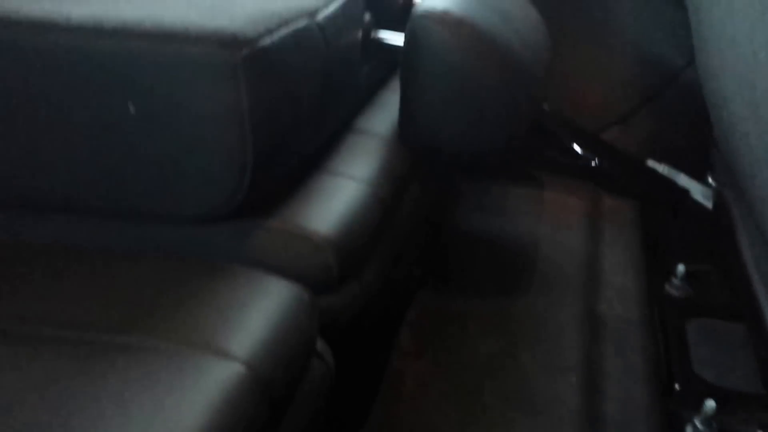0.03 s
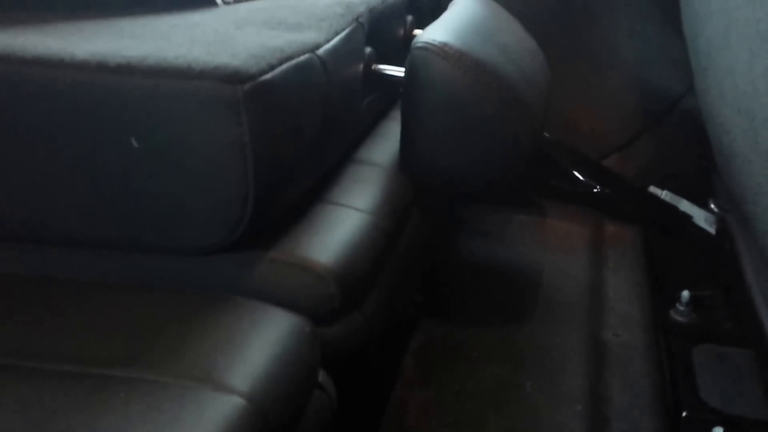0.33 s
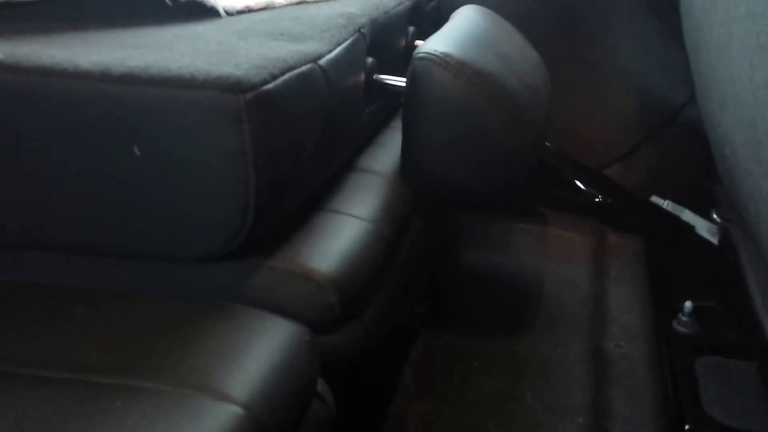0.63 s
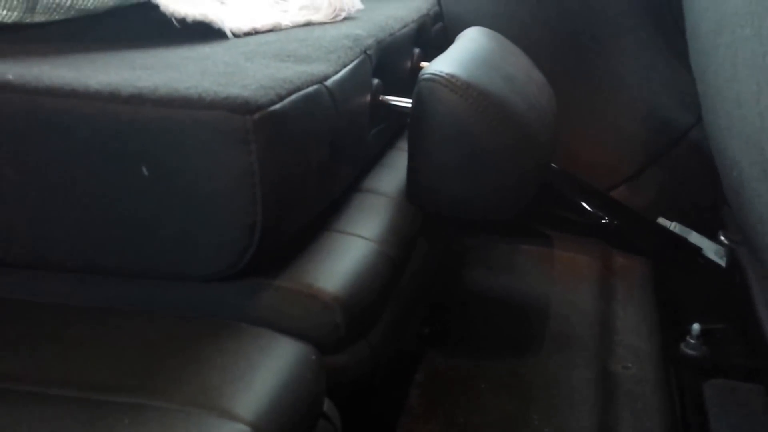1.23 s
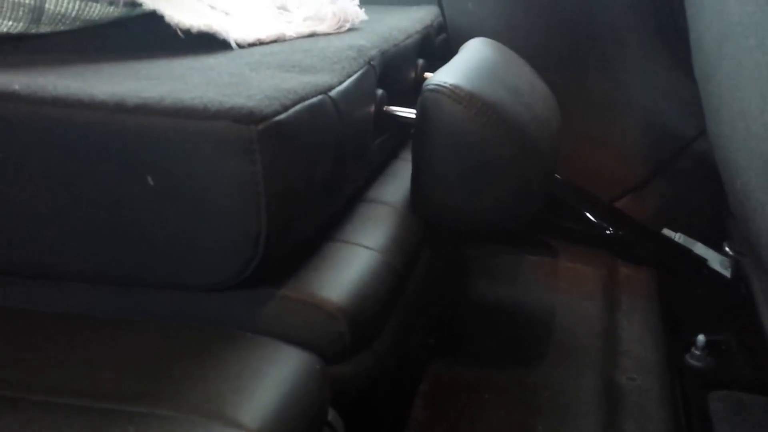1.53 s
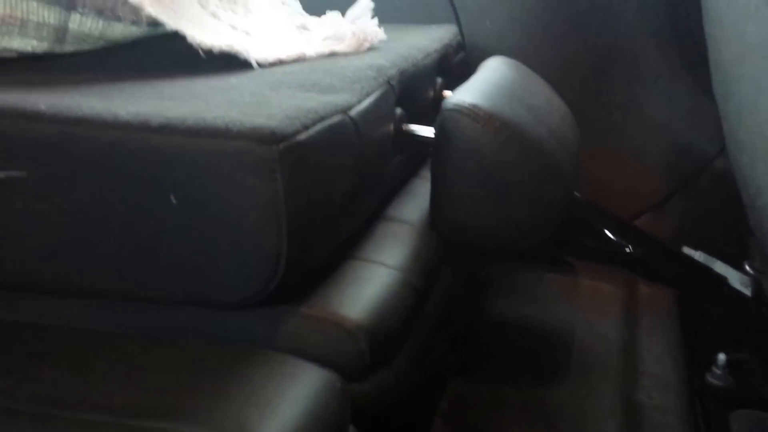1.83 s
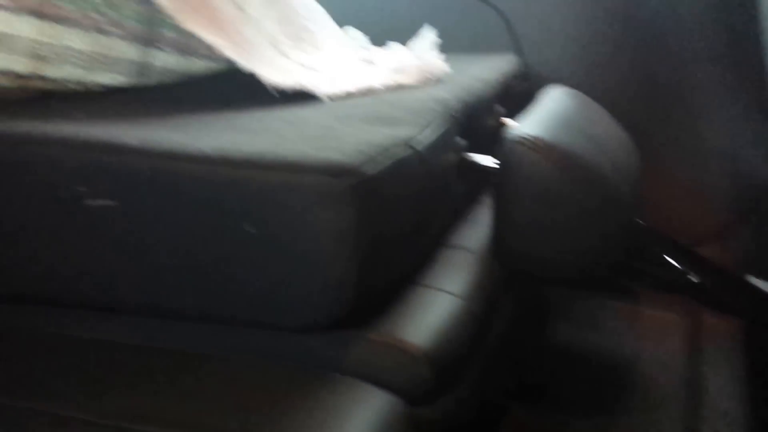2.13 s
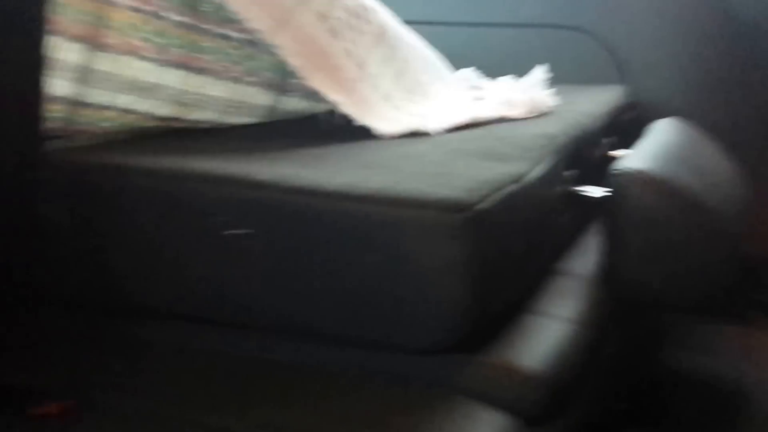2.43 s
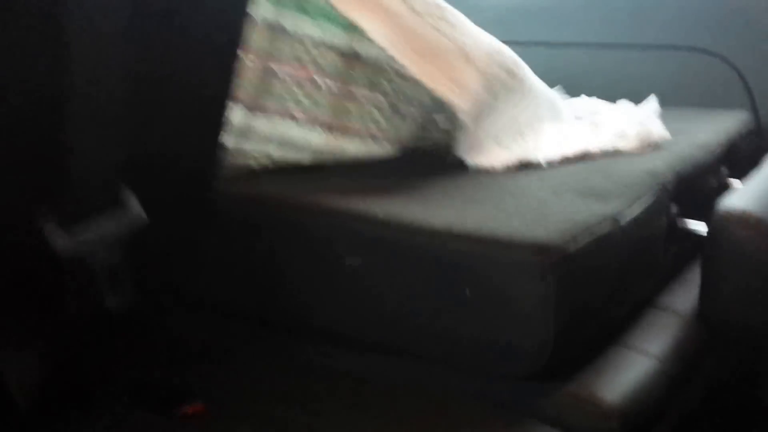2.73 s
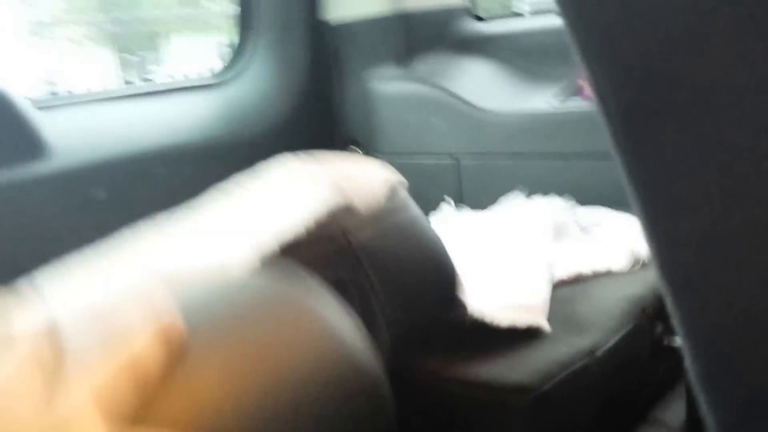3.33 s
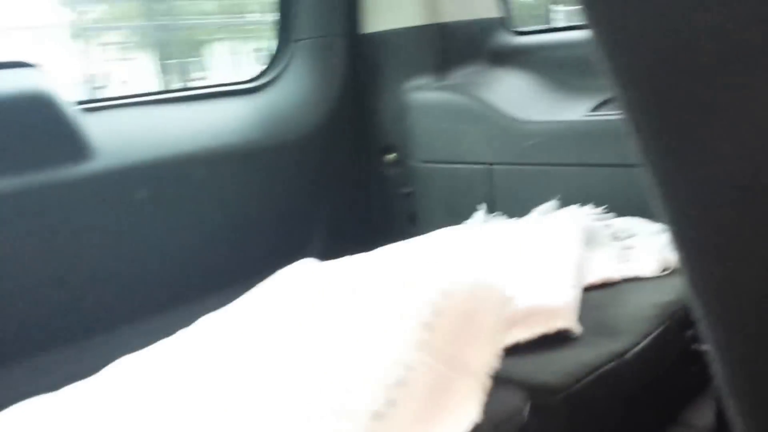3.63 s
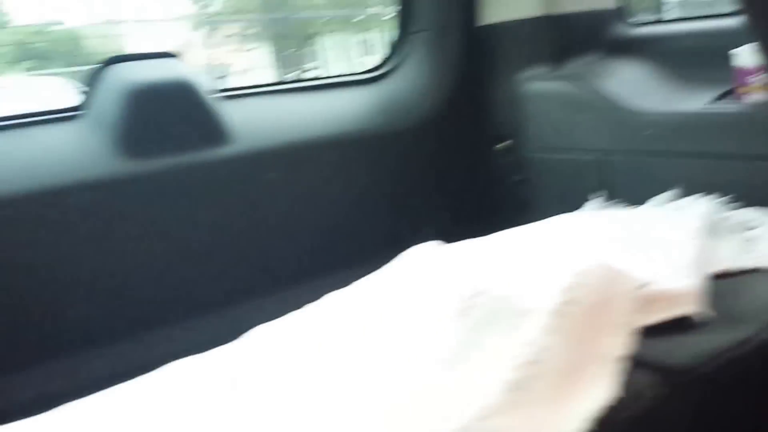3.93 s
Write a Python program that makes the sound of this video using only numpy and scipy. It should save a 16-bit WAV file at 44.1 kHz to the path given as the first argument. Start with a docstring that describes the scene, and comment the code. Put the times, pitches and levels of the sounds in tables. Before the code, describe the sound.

A car seat swings over with a cloth whoosh and latches with a loud clunk.

```python
"""Inside a parked car, a hand-held stereo microphone close to a folded seat back. A low cabin rumble
comes first. From 1.6 s plastic fittings click; the seat is swung over and its upholstery slides with
a swelling whoosh, among soft bumps of the padding and brief hinge squeaks. At 3.6 s the steel latch
snaps home, the seat thumps against its stop and the car body booms briefly. Last comes a thin squeal
as the seat settles."""
import sys
import numpy as np
from scipy import signal
from scipy.fft import rfft, irfft
from scipy.io import wavfile

SR = 44100
rng = np.random.default_rng(int(sys.argv[2]) if len(sys.argv) > 2 else 0)


def output_pcm(signal):
    """Save a mono or channel-first signal as 16-bit PCM at the path in sys.argv[1].

    Samples are clipped to [-1, 1] before scaling.
    """
    pcm = np.clip(np.atleast_2d(signal).T, -1, 1) * 32767
    wavfile.write(sys.argv[1], SR, np.round(pcm).astype(np.int16))


N = 176400


def undb(db):
    """Decibels to gain."""
    return 10 ** (np.asarray(db) / 20)


def unit(x):
    """Scale to rms 1."""
    return x / np.sqrt(np.mean(x ** 2))


def curve(table, column=1):
    """A column of a time table at every sample."""
    rows = np.array(table)
    return np.interp(np.arange(N) / SR, rows[:, 0], rows[:, column])


def freqs():
    """Frequency of each spectral bin."""
    return np.maximum(np.arange(N // 2 + 1) * SR / N, 1)


def across(table):
    """A (Hz, value) table at every bin."""
    rows = np.array(table)
    return np.interp(np.log(freqs()), np.log(rows[:, 0]), rows[:, 1])


def band(hz, width):
    """Gain of a steep resonance, its width in Hz."""
    f = freqs()
    return 1 / (1 + ((f * f - hz * hz) / (f * width)) ** 2)


def shape(x, gain):
    """Filter by a gain for each bin."""
    return irfft(rfft(x) * gain, N)


def flutter(hz, width):
    """A random waver of rms 1 around a given rate."""
    return unit(shape(rng.standard_normal(N), band(hz, width)))


# How alike the microphone's two sides are. Each row: frequency in Hz, correlation before clipping.
STEREO_LIKENESS = [(60, 3), (125, 2), (250, 1), (500, 0.85), (1000, 0.46), (2200, -0.11), (6000, 0),
                   (14000, 0)]
def noise(gain):
    """Coloured stereo noise of rms 1, alike on both sides in the bass."""
    like = np.clip(across(STEREO_LIKENESS), -.99, .99)
    mid, side = rfft(rng.standard_normal((2, N))) * gain * np.sqrt([1 + like, 1 - like])
    return unit(irfft(np.array([mid + side, mid - side]), N))


def fade(t60):
    """One second of decay after a very quick rise, falling 60 dB in t60 seconds."""
    t = np.arange(SR) / SR
    return undb(-60 * t / t60) * (1 - np.exp(-t / .0002))


def ring(modes):
    """One second of decaying modes."""
    t = np.arange(SR) / SR
    return sum(undb(db) * fade(t60) * np.sin(2 * np.pi * hz * t) for hz, db, t60 in modes)


def piece(x):
    """A random second of a long noise."""
    i = rng.integers(N - SR)
    return x[:, i:i + SR]


def add(out, start, x):
    """Mix a sound in at a time in seconds."""
    i = int(start * SR)
    out[:, i:i + x.shape[-1]] += x[..., :N - i]


def lean(x, balance_db):
    """Tip the sound between left and right, band by band."""
    gains = undb(across(balance_db) * np.array([[.5], [-.5]]))
    return shape(x, gains / np.sqrt(np.mean(gains ** 2, axis=0)))


# Room tone of the parked car. Each row: frequency in Hz, relative density in dB.
CABIN_SPECTRUM = [(20, -7), (40, -16), (60, -7.5), (90, -6), (128, 0), (175, -12.5), (290, -11),
                  (400, -18.5), (500, -21), (660, -19), (900, -23), (1500, -31), (2100, -36.5), (3000, -39),
                  (4300, -36.5), (7000, -38.5), (12000, -39), (14500, -42.5)]
# The rumble drifts a little. Each row: time in seconds, level in dB.
RUMBLE_DRIFT = [(0, -47), (1.2, -46), (1.5, -43), (1.85, -47), (2.2, -45), (2.6, -46.5), (3.3, -44),
                (4, -45)]
# Narrow resonances in the room tone. Each row: centre in Hz, width in Hz, level in dB.
CABIN_HUMS = [(136, 28, -58), (188.4, 9.6, -59.5), (632, 17, -64), (5200, 220, -73.5), (5800, 260, -70)]
def cabin():
    """All around the microphone: low rumble, a few narrow resonances and a faint steady hiss."""
    crossover_hz, hiss_db = 1900, -45
    air = noise(undb(across(CABIN_SPECTRUM)))
    rumble = shape(air, 1 / (1 + (freqs() / crossover_hz) ** 2))
    hum = sum(undb(db) * noise(band(hz, width)) for hz, width, db in CABIN_HUMS)
    return rumble * undb(curve(RUMBLE_DRIFT)) + (air - rumble) * undb(hiss_db) + hum


# Sliding cloth from close by. Each row: frequency in Hz, relative density in dB.
CLOTH_SPECTRUM = [(400, -22), (750, -4.5), (1000, -4.5), (1500, -4.5), (2150, -2.5), (2550, -4), (3200, -8),
                  (3900, -8.5), (4800, -5.5), (6200, -5), (7000, -8.5), (8000, -13), (10000, -17),
                  (12400, -18.5), (14500, -27.5)]
# The swing of the seat. Each row: time in seconds, friction level in dB, treble relative to it in dB.
FRICTION = [(1.4, -65, -7), (1.68, -65, 12.5), (1.85, -67, -6), (2.15, -55.5, -0.5), (2.3, -50, -0.5),
            (2.53, -41, -2.5), (2.8, -41.5, 0.5), (2.97, -39, 3.5), (3.13, -39, -2), (3.35, -41.5, -0.5),
            (3.5, -44.5, -1), (3.57, -40.5, -2), (3.75, -54.5, 13), (3.85, -49.5, 7), (3.89, -60, 4),
            (3.94, -58, 4), (3.99, -43, 4.5)]
# A narrow swish in the treble. Each row: time in seconds, level relative to the friction in dB.
SWISH_LEVEL = [(2.3, -16), (3.2, -18), (3.5, -6), (3.85, -12), (4, 5.5)]
def upholstery():
    """Cloth slides with a hiss and tiny snags of the weave; the padding rubs and the frame shudders."""
    snags_per_s, low_cut_hz, treble_hz, flutter_db = 900, 400, 3940, 0.65
    colour = undb(across(CLOTH_SPECTRUM)) / (1 + (low_cut_hz / freqs()) ** 4)
    snags = (rng.random(N) < snags_per_s / SR) * rng.standard_normal((2, N))
    snags *= undb(-0.5 * np.minimum(rng.exponential(size=N), 4))
    hiss = noise(colour) + undb(-8) * unit(shape(snags, colour))
    dull = shape(hiss, 1 / (1 + (freqs() / treble_hz) ** 4))
    treble = (hiss - dull) * undb(curve(FRICTION, column=2))
    level = undb(curve(FRICTION) + flutter_db * flutter(hz=10, width=26))
    swish = undb(curve(SWISH_LEVEL)) * noise(band(hz=5660, width=1800))
    rub = undb(-6.5) * noise(band(hz=227, width=560))
    shudder = undb(-7) * noise(band(hz=91, width=42))
    return (dull + treble + swish + rub + shudder) * level


# Rasp of the weave. Each row: centre in Hz, width in Hz, level relative to the friction in dB.
RASP_BANDS = [(2065, 280, -11.5), (2380, 470, -16)]
def rasp():
    """The weave catches and lets go, sounding two midrange resonances unevenly."""
    out = 0
    for hz, width, db in RASP_BANDS:
        catches_db = 3 * flutter(hz=13, width=26)
        out = out + undb(db + catches_db) * noise(band(hz, width))
    return out * undb(curve(FRICTION))


# Plastic clicks near the microphone. Each row: start in seconds, levels in dB of the body, knock,
# snap and tick bands, base t60 of the tail in seconds.
PLASTIC_KNOCKS = [(1.6331, -32, -29, -41.5, -38.5, 0.052), (1.9074, -52, -47, -39.5, -36.5, 0.043),
                  (1.9141, -35.5, -47, -42, -44.5, 0.047), (1.927, -46, -53, -48, -56, 0.023),
                  (2.171, -49, -62, -40, -56, 0.026), (2.174, -48, -60, -41, -40.5, 0.037),
                  (2.594, -40, -42, -50, -58, 0.036), (3.130, -31.5, -38, -35, -37, 0.047),
                  (3.2061, -42, -31.5, -36, -34.5, 0.056), (3.342, -48, -42, -38, -41, 0.029),
                  (3.379, -35.5, -38.5, -41, -48, 0.086), (3.535, -37, -36.5, -39, -42, 0.14),
                  (3.548, -40, -39, -33, -44, 0.084), (3.5665, -37, -35, -37, -48, 0.19),
                  (3.683, -51, -31.5, -31.5, -54, 0.14), (3.718, -42, -37, -32, -53, 0.1),
                  (3.753, -46, -50, -55, -58, 0.053)]
# Those four bands, low to high. Each row: centre in Hz, width in Hz, factor on the decay times.
PLASTIC_BANDS = [(264, 420, 1.74), (830, 2160, 1.8), (2400, 3500, 1.65), (5250, 3000, 1.5)]
# Ring of the trim. Each row: pitch in Hz, level relative to the knock band in dB, t60 in seconds.
TRIM_RING = [(255, -3.5, 0.056), (593, -2, .06), (1340, -19, .06), (1790, -11, 0.051), (2440, -15, 0.045)]
def fittings():
    """Plastic parts knock with a crack, a noisy tail and a short ring of the trim."""
    crack_t60_s, tail_db = 0.0056, -5.5
    out = np.zeros((2, N))
    bands = [(noise(band(hz, width)), stretch) for hz, width, stretch in PLASTIC_BANDS]
    trim = ring(TRIM_RING)
    for start, *levels, t60 in PLASTIC_KNOCKS:
        add(out, start, undb(levels[1]) * trim)
        for db, (grain, stretch) in zip(levels, bands):
            envelope = fade(crack_t60_s * stretch) + undb(tail_db) * fade(t60 * stretch)
            add(out, start, undb(db) * piece(grain) * envelope)
    return out


# Soft bumps of the cushion. Each row: start in seconds, level in dB, centre in Hz.
CUSHION_BUMPS = [(2.062, -44, 430), (2.115, -37.5, 166), (2.204, -42.5, 150), (2.325, -42.5, 553),
                 (2.468, -37, 265), (2.489, -38, 169), (2.614, -43, 237), (2.648, -41, 250),
                 (2.73, -39, 203), (3.17, -44, 150), (3.269, -39.5, 313)]
# A dull knock of the padded frame. Each row: pitch in Hz, level in dB, t60 in seconds.
FRAME_RING = [(320, -24.5, 0.027), (585, -27, 0.0096), (855, -17.5, 0.012)]
def padding():
    """Soft bumps swell and die as the cushion shifts; the padded frame knocks once."""
    rise_s, frame_knock_s = 0.0058, 3.1629
    out = np.zeros((2, N))
    t = np.arange(SR) / SR
    swell = fade(t60=0.055) * (1 - np.exp(-(t / rise_s) ** 2))
    for start, db, hz in CUSHION_BUMPS:
        add(out, start, undb(db) * swell / swell.max() * piece(noise(band(hz, width=hz * 0.45))))
    add(out, frame_knock_s, -ring(FRAME_RING))
    return out


# Squeaks of the hinge. Each row: start in seconds, pitch in Hz, level in dB, t60 in seconds.
HINGE_SQUEAKS = [(2.175, 4960, -39, 0.052), (3.535, 2350, -20, 0.03), (3.55, 2070, -35, 0.026),
                 (3.716, 3340, -39, 0.081)]
def hinge():
    """The turning hinge gives brief squeaks, each a tone roughened by noise around its pitch."""
    out = np.zeros((2, N))
    for start, hz, db, t60 in HINGE_SQUEAKS:
        roughness = undb(db - 0.5) * fade(t60) * piece(noise(band(hz, width=hz * .12)))
        add(out, start, ring([(hz, db, t60)]) + roughness)
    return out


# The steel latch at close range. Each row: start in seconds, level in dB, ring relative to it in dB,
# brightness in dB per octave.
LATCH_STRIKES = [(3.6264, -16.5, -20, -2), (3.6286, -3, -21, 4.5), (3.6313, -11, -8.5, -4.5),
                 (3.693, -24, -12, 7)]
# Colour of a strike. Each row: frequency in Hz, relative density in dB.
LATCH_SPECTRUM = [(700, -8.5), (1500, -19), (2100, -1.5), (2750, -1.5), (3400, -3), (4500, -0.5),
                  (6000, 4.5), (6900, 2.5), (8200, -6.5), (9500, -9), (10900, -17), (12200, -15),
                  (13400, -19), (14500, -34)]
# Ring of the steel. Each row: pitch in Hz, relative level in dB, t60 in seconds.
STEEL_RING = [(2760, 0, 0.066), (3200, -22, .12), (4700, -20, 0.087), (5100, -18, 0.066),
              (5679, -13, 0.062), (5750, -6, 0.074), (6100, 3, .08), (6400, -12, .085), (6740, -10, .1)]
# Catch and spring zing. Each row: start in seconds, centre and width in Hz, level in dB, t60 in seconds.
SPRING_ZINGS = [(3.693, 5230, 1700, -23, 0.055), (3.629, 11500, 3700, -37.5, 0.17),
                (3.6286, 2530, 360, -17.5, .014), (3.6288, 12300, 4800, -15, 0.0038),
                (3.631, 6230, 1100, -15, 0.026)]
def latch():
    """The steel catch snaps over its striker and rebounds once, shaking its spring."""
    low_cut_hz = 700
    out = np.zeros((2, N))
    steel = undb(-11) * ring(STEEL_RING)
    for start, db, ring_db, tilt_db in LATCH_STRIKES:
        colour = undb(across(LATCH_SPECTRUM) + tilt_db * np.log2(freqs()))
        grain = piece(noise(colour / (1 + (low_cut_hz / freqs()) ** 2)))
        crack = grain * fade(t60=0.0057)
        tail = grain * fade(t60=0.11) + steel
        add(out, start, undb(db) * (crack + undb(ring_db) * tail))
    for start, hz, width, db, t60 in SPRING_ZINGS:
        add(out, start, undb(db) * fade(t60) * piece(noise(band(hz, width))))
    return out


# The seat meets its stop. Each row: start in seconds, level in dB, contact in seconds, rattle in dB.
STOP_THUMPS = [(3.6288, -19.5, 0.0018, -28.5), (3.645, -17, 0.0058, -26), (3.6603, -17, 0.00051, -24.5),
               (3.675, -30, 0.003, -46), (3.701, -25, 0.004, -31.5)]
# Seat frame and car body from inside. Each row: pitch in Hz, relative level in dB, t60 in seconds.
BODY_RING = [(28.2, -12, 1), (40.4, -18, 1), (57, -18, 0.36), (87.6, -10, 0.29), (132.6, -10.5, 0.31),
             (164, -10.5, 0.14), (191, -0.5, 0.058), (270.3, -10, 0.09), (329, 3.5, 0.035), (447, 5, 0.024),
             (493, -0.5, 0.041), (657, -22, 0.078), (807, -4, 0.041), (1100, -22, .03)]
def seat_stop():
    """Padded blows ring the frame and body, shake loose parts and leave a boom in the cabin."""
    out = np.zeros((2, N))
    body = ring(BODY_RING)
    loose_parts = noise(band(hz=533, width=1700))
    cabin_air = noise(band(hz=119, width=130))
    t = np.arange(SR // 10) / SR
    for start, db, contact_s, rattle_db in STOP_THUMPS:
        push = t * np.exp(-4 * t / contact_s)  # longer contact, duller blow
        blow = signal.fftconvolve(body, push / push.sum())[:SR]
        boom = undb(-9) * piece(cabin_air) * fade(t60=0.36)
        rattle = undb(rattle_db) * piece(loose_parts) * fade(t60=0.12)
        add(out, start, undb(db) * (boom - blow) + rattle)
    return out


def squeal():
    """As the seat settles, a faint rubbing tone swells, sags in pitch and fades."""
    start_s, length_s, start_hz, sag_hz_per_s = 3.86, 0.16, 1446, 790
    t = np.clip(np.arange(N) / SR - start_s, 0, length_s)
    hz = (start_hz - sag_hz_per_s * t) * (1 + 0.043 * flutter(hz=73, width=200))
    return undb(-48.5) * np.sin(np.pi * t / length_s) * np.sin(2 * np.pi * np.cumsum(hz) / SR)


# Left-right balance of each sound, band by band; the latch's top treble is nearly centred.
# Each row: frequency in Hz, left minus right in dB.
CABIN_BALANCE = [(60, 1), (400, 5), (1000, 5), (2100, 7), (3000, -2), (5800, 6.5), (7200, -1), (9000, -6),
                 (14000, -4)]
SEAT_BALANCE = [(60, 1.5), (400, 0), (750, 1.5), (1270, 6), (2330, 9.5), (4000, 4.5), (6200, 12.5),
                (7600, 0.5), (9000, -5), (11000, -7), (12500, -14)]
FITTINGS_BALANCE = [(150, 0), (550, 6), (900, 3.5), (2300, 7.5), (3600, 6), (6200, 9), (7600, 1),
                    (9000, -10), (12500, -21)]
LATCH_BALANCE = [(700, 5), (1500, 9), (2330, 17), (4000, 6), (6200, 16), (7600, 1), (9000, -4), (12500, -2)]
def scene():
    """The close seat reaches the microphone's left side slightly late; the rumble is all around."""
    left_lag_s = .00022
    seat = lean(upholstery() + rasp() + padding() + squeal() + seat_stop(), SEAT_BALANCE)
    left, right = seat + lean(fittings() + hinge(), FITTINGS_BALANCE) + lean(latch(), LATCH_BALANCE)
    late_left = shape(left, np.exp(-2j * np.pi * freqs() * left_lag_s))
    return np.array([late_left, right]) + lean(cabin(), CABIN_BALANCE)


def record(dry):
    """The hand-held recorder rounds the highest peaks and cuts the top."""
    ceiling, top_hz = .8, 14600
    rounded = ceiling * np.tanh(dry / ceiling)
    return signal.sosfilt(signal.ellip(8, .2, 70, top_hz, fs=SR, output="sos"), rounded)


dry = scene()
out = record(dry)
output_pcm(out)
```